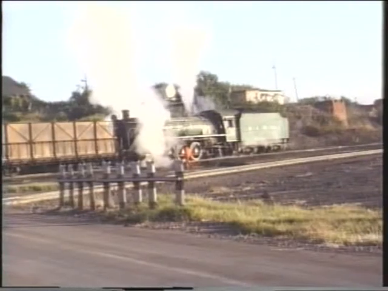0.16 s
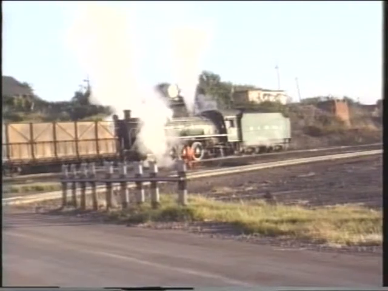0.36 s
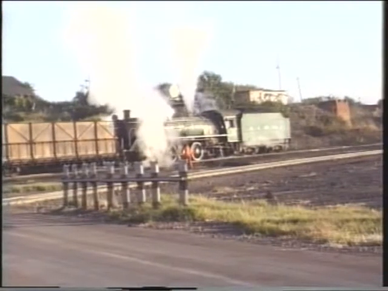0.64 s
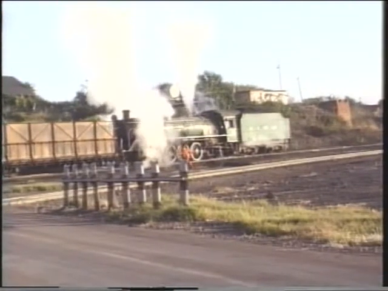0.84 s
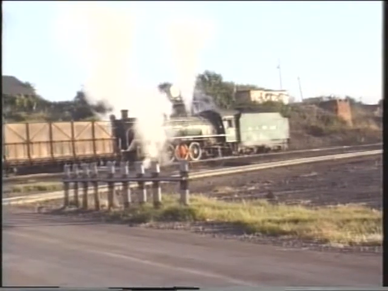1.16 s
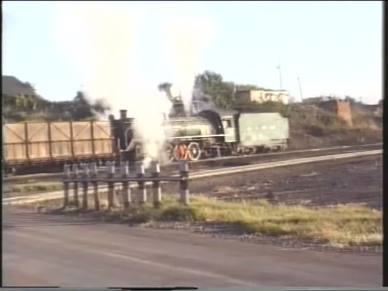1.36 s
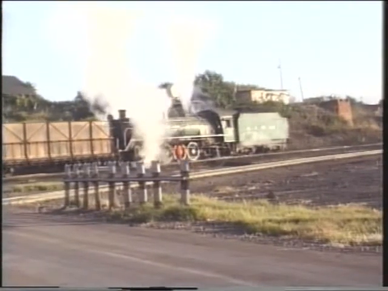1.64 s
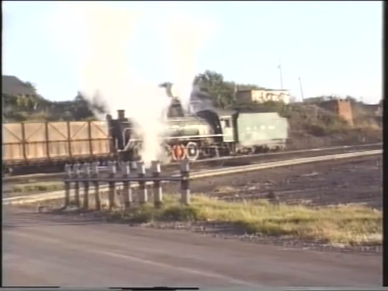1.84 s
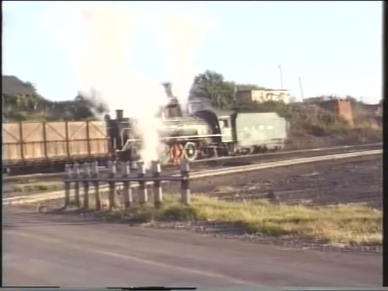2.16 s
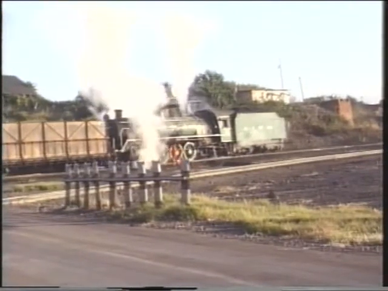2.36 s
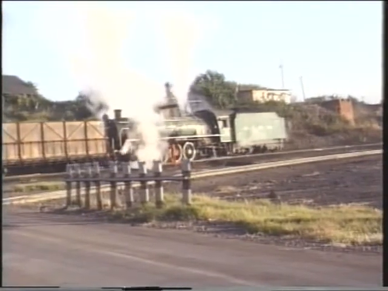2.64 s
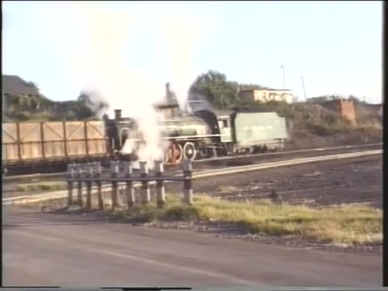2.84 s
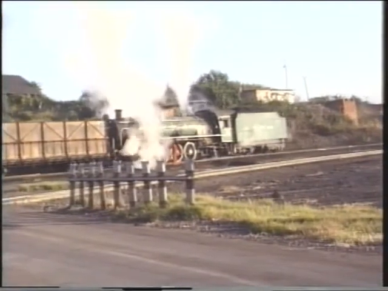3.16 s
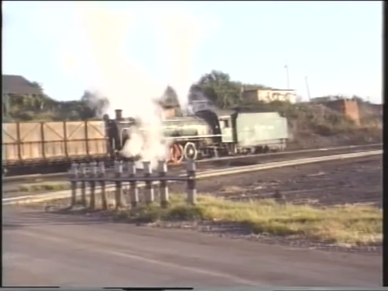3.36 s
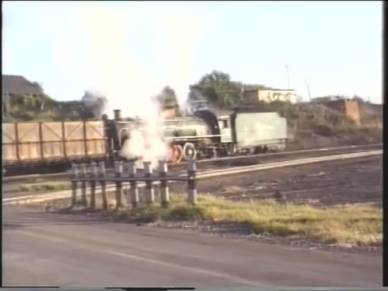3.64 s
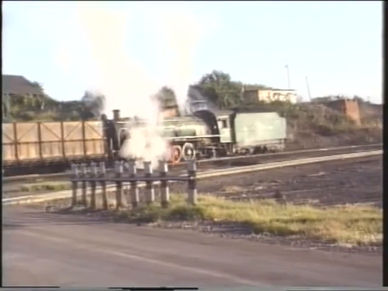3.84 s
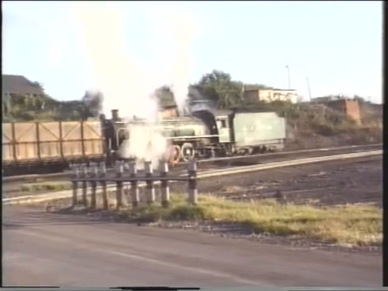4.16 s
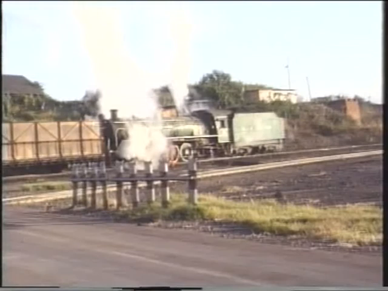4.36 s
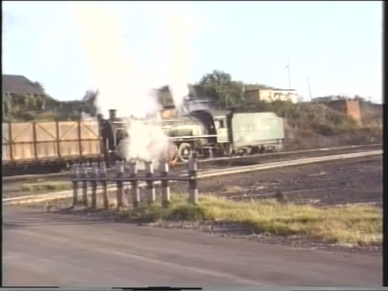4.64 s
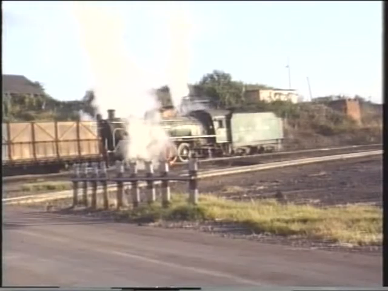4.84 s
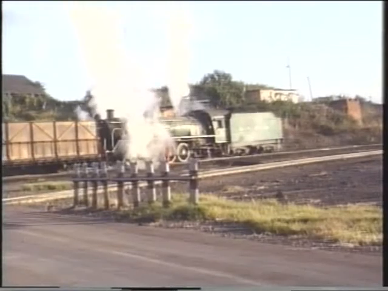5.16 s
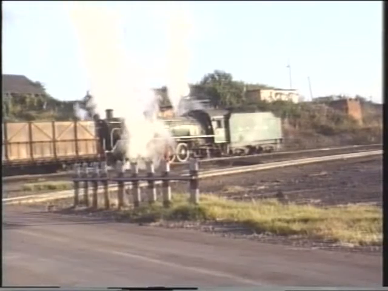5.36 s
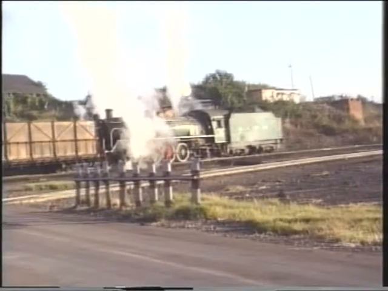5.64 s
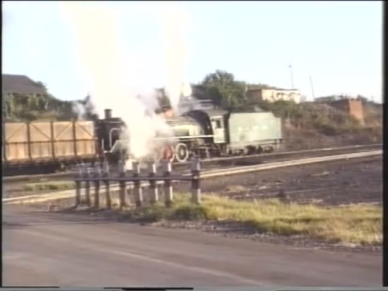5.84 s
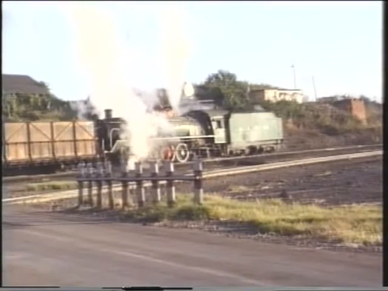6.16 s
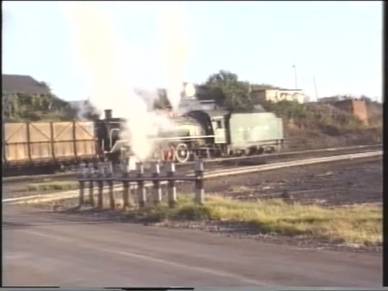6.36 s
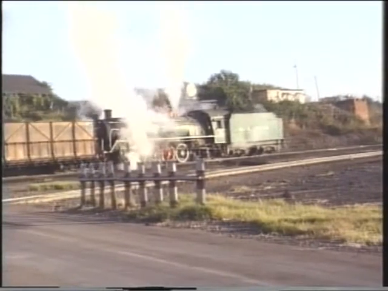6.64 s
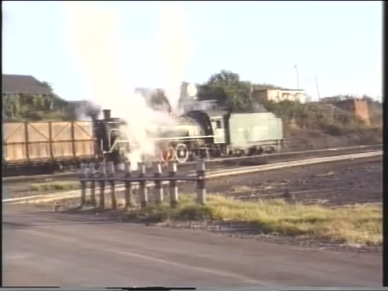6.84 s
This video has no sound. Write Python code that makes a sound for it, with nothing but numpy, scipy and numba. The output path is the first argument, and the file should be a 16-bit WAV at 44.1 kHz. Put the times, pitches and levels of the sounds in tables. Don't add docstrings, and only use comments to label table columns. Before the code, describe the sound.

Outdoors at some distance, a steam locomotive hauls a heavy train slowly. Six rough, airy exhaust roars come a little over a second apart, each starting sharply, sagging and echoing briefly off wagons and bank. Between them steam hisses constantly, rising and falling, with short wet spurts and soft thumps. One dull iron coupling knock sounds after the fourth beat. A mono camcorder microphone slightly ducks the background on each beat.

```python
import sys
import numpy as np
from scipy import signal
from scipy.fft import rfft, irfft
from scipy.io import wavfile
from scipy.ndimage import uniform_filter1d
from numba import njit

SR = 44100
rng = np.random.default_rng(int(sys.argv[2]) if len(sys.argv) > 2 else 0)


def undo_db(level):
    steps = np.asarray(level, float) / 20
    return 10 ** steps


def inscribe(sig):
    pcm = np.round(np.clip(np.atleast_2d(sig).T, -1, 1) * 32767)
    wavfile.write(sys.argv[1], SR, pcm.astype(np.int16))


N = 308700
TIME = np.arange(N) / SR

# t/s, valve open/s, jet level/dB, boom over jet/dB, edge over jet/dB
BEATS = [
    (0.668, 0.19, -29, -6, -5),
    (1.743, 0.16, -28, -8, -2.5),
    (2.705, 0.15, -27.5, -7, -3),
    (3.912, 0.17, -28.5, -7, -5.5),
    (5.355, 0.19, -28, -8.5, -4),
    (6.55, 0.17, -28, -9.5, -3),
]


def unit(x):
    return x / np.sqrt(np.mean(x ** 2))


def walk(rate):
    hold = int(SR / rate)
    levels = np.repeat(rng.standard_normal(N // hold + 1), hold)
    return unit(uniform_filter1d(uniform_filter1d(levels, hold), hold)[:N])


def ring(x, hz, width):
    b, a = signal.iirpeak(hz, hz / width, fs=SR)
    return signal.lfilter(b, a, signal.lfilter(b, a, x))


def roar(modes, flutter_db):
    out = np.zeros(N)
    for hz, width, db in modes:
        flutter = undo_db(db + flutter_db * walk(25))
        out += flutter * unit(ring(rng.standard_normal(N), hz, 1.57 * width))
    return unit(out)


def hiss(spectrum, gust_db, flicker_db):
    hz, db = np.transpose(spectrum)
    f = np.maximum(np.arange(N // 2 + 1) * SR / N, 1)
    colour_db = np.interp(np.log(f), np.log(hz), db, left=-120, right=-120)
    coloured = rfft(rng.standard_normal(N)) * undo_db(colour_db)
    half_octave = 2 * np.log2(f)
    gust = gust_db * walk(9)
    out = np.zeros(N)
    for centre in np.arange(np.floor(2 * np.log2(hz[0])), 2 * np.log2(hz[-1]) + 1):
        share = np.clip(1 - np.abs(half_octave - centre), 0, 1)
        out += undo_db(gust + flicker_db * walk(7)) * irfft(coloured * share, N)
    return unit(out)


def strokes():
    # cock level/dB, drift/dB per s, upper over lower hiss/dB, rumble/dB
    stroke_table = [
        (-38, 1.8, -3, -1),
        (-39.5, 1.4, -1.2, 0),
        (-33.5, -1, -1.1, 0),
        (-35.5, -1, -0.6, 0.7),
        (-37, -0.8, -3, 0),
        (-41, 3.5, -2.2, 1),
        (-39, 18.5, -0.5, 1),
    ]
    admit_s, change_s = 0.2, 0.12
    starts = np.append(0, np.array(BEATS)[:, 0] + admit_s)
    stroke = np.searchsorted(starts, TIME, side="right") - 1
    cocks_db, drift, pinch_db, rumble_db = np.array(stroke_table)[stroke].T
    held = [cocks_db + drift * (TIME - starts[stroke]), pinch_db, rumble_db]
    return uniform_filter1d(held, size=int(change_s * SR), mode="nearest")


def drain_cocks(blow_db, pinch_db):
    # f/Hz, level/dB per Hz
    cock_colour = [(290, -35), (500, -10), (574, -9), (763, -10), (852, -12), (926, -8.5), (1400, -0.5),
                   (2000, -0.5), (2200, -3.5), (2590, -3.5), (2760, -3.5), (3120, -4.5), (4500, -7),
                   (5850, -15.5), (9900, -120)]
    # f/Hz, width/Hz, level/dB
    nozzles = [(1660, 120, .3), (2050, 80, -3.5), (2575, 100, -1.5), (4930, 130, -3.5), (5600, 170, -4),
               (6590, 300, -5)]
    steam = hiss(cock_colour, 0.5, 0.45)
    lower = signal.sosfilt(signal.butter(2, 2100, "low", fs=SR, output="sos"), steam)
    upper = signal.sosfilt(signal.butter(2, 2100, "high", fs=SR, output="sos"), steam)
    body = lower - undo_db(pinch_db) * upper
    return undo_db(blow_db - 0.68) * (body + undo_db(-12.5) * roar(nozzles, 2.5))


def leaking_valve():
    # f/Hz, level/dB per Hz
    valve_colour = [(1470, -39), (2500, -11), (2750, -6.5), (3080, -6), (3340, -1), (4060, 0), (4420, 0),
                    (5000, 1.5), (6120, -1.5), (6770, -1.5), (8630, -11), (9660, -14), (10300, -29),
                    (13400, -49), (22000, -120)]
    # t/s, level/dB
    flow = [(0.0, -43), (0.6, -39.5), (0.76, -42), (1.4, -43), (1.77, -42), (1.79, -41.5), (2.13, -38.5),
            (2.67, -38.5), (2.83, -40.5), (3.02, -39), (3.92, -40), (3.98, -42.5), (4.78, -40.5),
            (6.2, -43), (6.67, -41.5), (6.69, -43), (6.86, -41), (7.0, -36.5)]
    draw_db, draw_rise_s, draw_back_s = -1.6, 0.061, 0.15
    draw = np.zeros(N)
    for s, *_ in BEATS:
        draw += np.interp(TIME - s, [0, draw_rise_s, draw_rise_s + draw_back_s], [0, 1, 0])
    flow_db = np.interp(TIME, *np.transpose(flow)) + draw_db * draw
    return undo_db(flow_db + 1.9) * hiss(valve_colour, 0.85, 0.7)


def yard(blow_db, rumble_db):
    # f/Hz, level/dB per Hz
    yard_colour = [(12, -46), (20, -14), (54, -23), (162, -10), (232, -9.5), (266, -6.5), (300, -9),
                   (492, -12.5), (782, -5), (882, -8), (944, -5), (1140, -8), (1200, -2), (1560, -36),
                   (2640, -120)]
    yard_db = -44.5 + rumble_db + 0.29 * (blow_db - blow_db.mean())
    return undo_db(yard_db) * hiss(yard_colour, 0.36, 1.9)


def spurts():
    # t/s, length/s, level/dB, f/Hz, width/Hz
    spurt_table = [(.08, 0.15, -41.5, 1450, 600), (0.518, 0.11, -46, 1900, 900),
                   (.79, 0.094, -39, 2300, 905), (1.45, 0.18, -42.5, 2470, 1600),
                   (1.787, 0.073, -32, 1400, 500), (2.02, .16, -39, 2100, 700),
                   (2.378, 0.093, -38, 1920, 600), (2.755, 0.087, -38, 2300, 800),
                   (3.105, 0.072, -48.5, 280, 200), (3.462, 0.077, -48.5, 262, 200),
                   (4.02, .1, -42.5, 2400, 1400), (4.18, .12, -49.5, 190, 90), (4.699, .22, -39, 1650, 600),
                   (5.49, 0.089, -40.5, 165, 60), (5.502, .08, -45, 2100, 700), (6.2, .1, -44, 1590, 500),
                   (6.64, 0.085, -37.5, 2500, 1500), (6.636, .07, -43, 5200, 2500),
                   (6.965, 0.089, -42, 2800, 1600), (5.394, .07, -42, 5600, 3000),
                   (1.55, 0.24, -52, 5960, 3000), (6.716, .06, -36, 267, 110), (.72, .07, -44, 3000, 900),
                   (5.42, .08, -43, 3000, 900), (4.0, .1, -41.5, 200, 70), (2.9, .05, -42, 700, 600),
                   (6.58, .035, -35, 720, 200), (4.07, .08, -39, 165, 60), (1.855, .045, -37, 310, 130),
                   (5.425, .04, -38, 310, 130), (6.79, .06, -48, 170, 70), (6.575, .04, -43, 170, 70),
                   (.86, .06, -42, 2500, 1200), (6.34, .14, -43, 1550, 500), (5.335, .04, -46, 500, 500),
                   (6.62, .06, -38, 2300, 700), (6.585, .05, -37, 1690, 150), (5.51, .04, -41, 165, 60),
                   (6.63, .08, -42, 560, 170), (.76, .1, -39, 1600, 250)]
    out = np.zeros(N)
    for s, length, db, hz, width in spurt_table:
        near = np.abs(TIME - s) < length
        noise = np.resize(rng.standard_normal(SR // 2), near.sum())
        swell = np.cos(np.pi / 2 * (TIME[near] - s) / length) ** 2
        out[near] += undo_db(db) * swell * unit(ring(noise, hz, 1.4 * width))
    return out


def exhaust():
    # f/Hz, width/Hz, level/dB
    jet_modes = [(1170, 230, -1.8), (1276, 180, 0.22), (1517, 170, -1.3), (1660, 160, -0.056)]
    chimney_modes = [(157, 59, 1.5), (216.5, 85, -0.5), (298, 75, 0), (392, 80, -0.5)]
    smokebox_modes = [(630, 200, 1.3), (824, 166, -2.5)]
    edge_modes = [(2315, 430, 6), (2900, 690, -1), (3150, 400, -5.5), (4370, 730, -7)]
    smokebox_db = [-34.5, -32.5, -33, -33.5, -32.5, -33]
    # rise/s, sag/dB per s, outlasts valve/s, dying/dB per s
    shapes = [
        (0.028, -21.5, -0.02, -110),
        (0.014, 2.5, 0.021, -200),
        (0.021, -23, -0.005, -130),
        (0.025, -28, -0.046, -110),
    ]
    # delay/s, level/dB
    echoes = [(.045, -11), (.11, -20.5), (.19, -21.5)]
    creep_db, creep_s = -14.5, 0.027
    quick_open_s, sag_power, edge_lingers = 0.16, 1.9, 0.66
    gains = np.zeros((4, N))
    for (s, open_s, jet_db, boom_db, edge_db), box_db in zip(BEATS, smokebox_db):
        t = np.maximum(TIME - s, 0)
        parts_db = jet_db, jet_db + boom_db, box_db, jet_db + edge_db
        droop = (quick_open_s / open_s) ** sag_power
        edge_s = edge_lingers * (open_s - quick_open_s)
        creep = undo_db(creep_db) * np.exp(np.minimum(TIME - s, 0) / creep_s)
        for k, (rise, sag_db, longer, dying_db) in enumerate(shapes):
            end = open_s + longer + edge_s * (k == 3)
            opening = np.maximum(np.minimum(t / rise, 1), creep)
            sag = droop * sag_db * np.minimum(t, end)
            dying = dying_db * np.maximum(t - end, 0)
            gains[k] += opening * undo_db(parts_db[k] + sag + dying)
    parts = [roar(jet_modes, 1.4), roar(chimney_modes, 1.5), roar(smokebox_modes, 1.2), roar(edge_modes, 1.3)]
    direct = np.sum(gains * parts, axis=0)
    direct = signal.sosfilt(signal.butter(4, 115, "high", fs=SR, output="sos"), direct)
    slug = undo_db(-63) * unit(gains[0] ** 2 * ring(rng.standard_normal(N), 20.5, 22))
    late = sum(undo_db(db) * np.roll(direct, int(s * SR)) for s, db in echoes)
    return direct + slug + late


def coupling():
    # t/s, level/dB
    knocks = [
        (5.0605, -21),
    ]
    # f/Hz, level/dB, t60/s
    iron_modes = [(424, 7.5, 0.033), (680, 1.5, 0.022), (950, 11.5, .019), (108, -20.5, 0.21)]
    out = np.zeros(N)
    for s, db in knocks:
        t = np.maximum(TIME - s, 0)
        swell = (1 - np.exp(-t / 0.004)) ** 2
        for hz, mode_db, t60 in iron_modes:
            decay = np.exp(-np.log(1000) * t / t60)
            out += undo_db(db + mode_db) * swell * decay * np.sin(2 * np.pi * hz * t)
    return out


def scene():
    blow_db, pinch_db, rumble_db = strokes()
    leaks = drain_cocks(blow_db, pinch_db) + leaking_valve() + yard(blow_db, rumble_db)
    return np.tile(leaks + spurts() + exhaust() + coupling(), (2, 1))


@njit
def follow(x, attack, release):
    e, out = np.abs(x[:2000]).mean(), np.empty(len(x))
    for i in range(len(x)):
        e += (abs(x[i]) - e) * (attack if abs(x[i]) > e else release)
        out[i] = e
    return out


def patchy_top(x, quiet):
    low_hz, high_hz, line_hz = 10030, 10660, 43
    mirror_hz, top_hz = 11340, 12400
    frame_len, offset = 2048, 744
    spectrum, f = rfft(x), np.arange(N // 2 + 1) * SR / N
    out = irfft(spectrum * (f < low_hz), N)
    frame = (np.arange(N) + frame_len - offset) // frame_len
    spare = rng.random(N // frame_len + 2) > 0.13
    for hz in np.arange(low_hz, high_hz, line_hz):
        share = 0.3 - 0.26 * (hz - low_hz) / (high_hz - low_hz)
        kept = spare * (rng.random(len(spare)) < share)
        gate = uniform_filter1d(uniform_filter1d(1.0 * kept[frame] * quiet, size=600), size=600)
        line = irfft(spectrum * (f >= hz) * (f < hz + line_hz), N)
        out = out + undo_db(12.5 + (hz - low_hz) / 110) * gate * line
    mirror = rfft(out * (-1.0) ** np.arange(N)) * (f > mirror_hz) * (f < top_hz)
    fade = np.clip((f - mirror_hz) / 120, 0, 1) * undo_db(-7 - 0.027 * (f - mirror_hz))
    return out + irfft(mirror * fade, N)


def top_cut(x):
    return signal.sosfilt(signal.butter(12, 12400, fs=SR, output="sos"), x)


def record(dry):
    e = follow(dry[0], 1 / (0.03 * SR), 1 / (0.12 * SR))
    gain = np.minimum(undo_db(-35.5) / e, 1) ** 0.15
    rounded = 0.19 * np.tanh(dry[0] * gain / 0.19)
    quiet = np.all([np.abs(TIME - s - 0.8 * open_s) > 0.7 * open_s for s, open_s, *_ in BEATS], axis=0)
    mono = patchy_top(rounded, quiet)
    return top_cut(np.tile(mono, (2, 1)))


dry = scene()
out = record(dry)
inscribe(out)
```